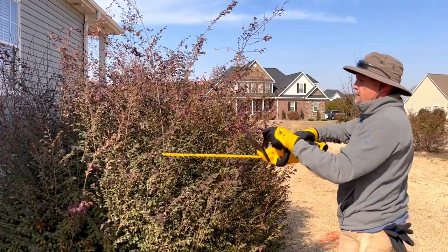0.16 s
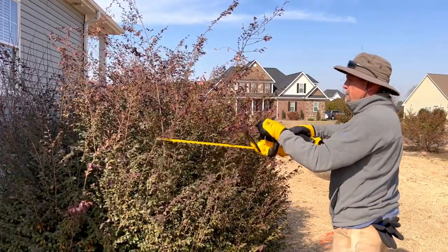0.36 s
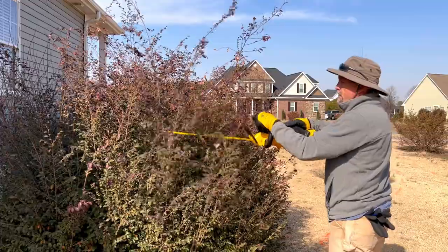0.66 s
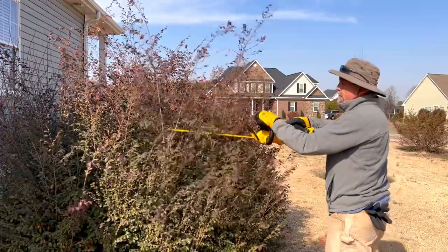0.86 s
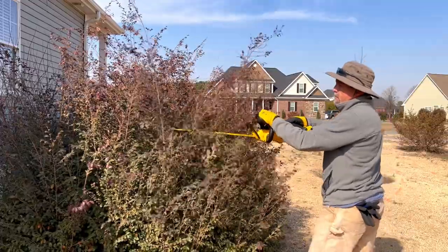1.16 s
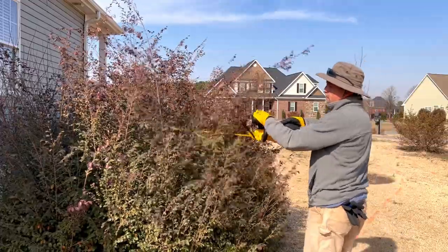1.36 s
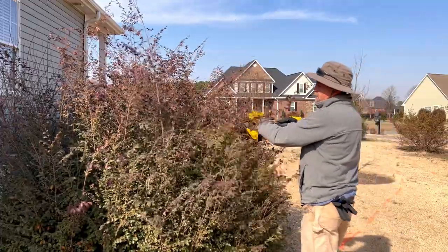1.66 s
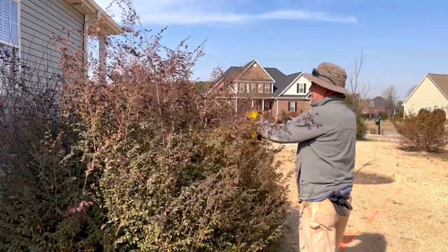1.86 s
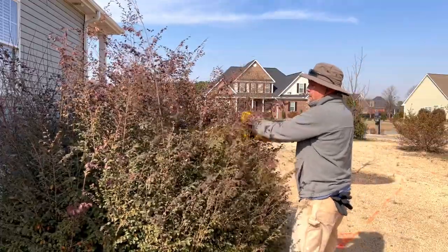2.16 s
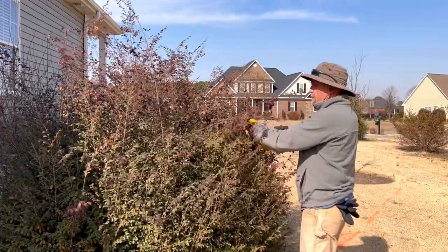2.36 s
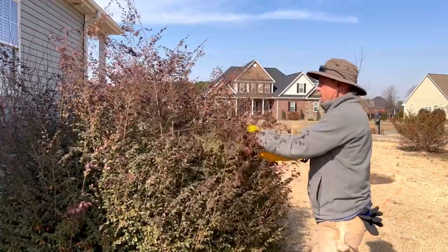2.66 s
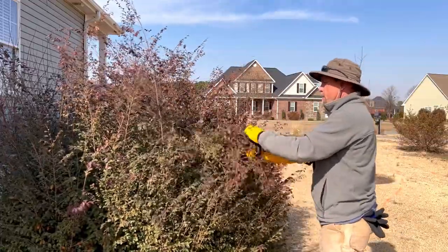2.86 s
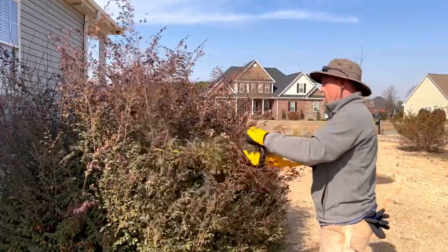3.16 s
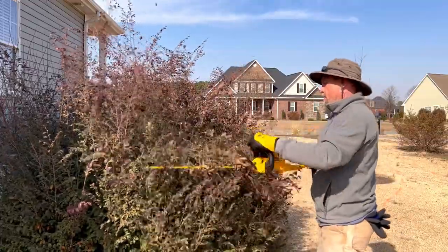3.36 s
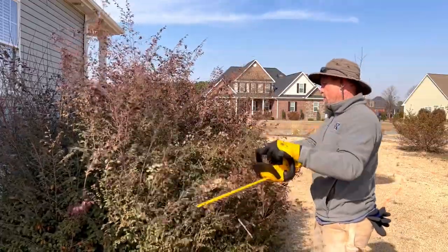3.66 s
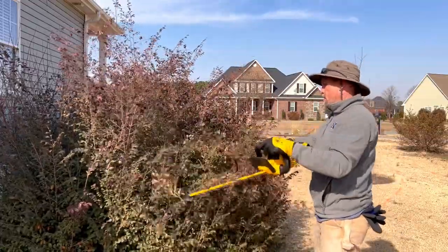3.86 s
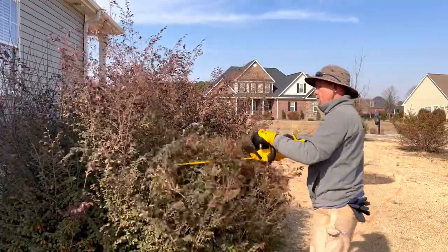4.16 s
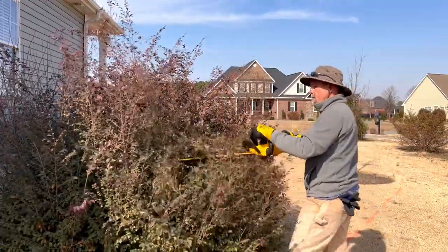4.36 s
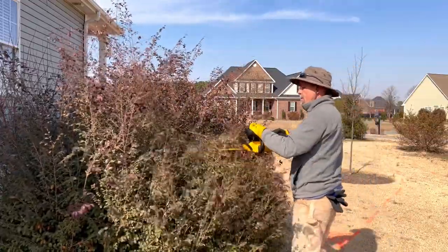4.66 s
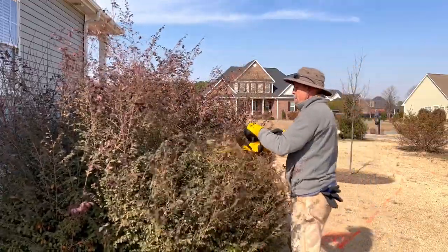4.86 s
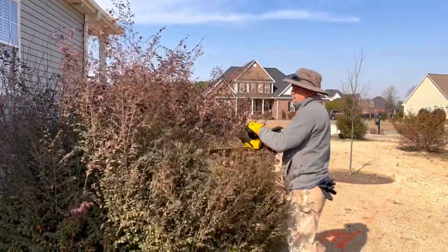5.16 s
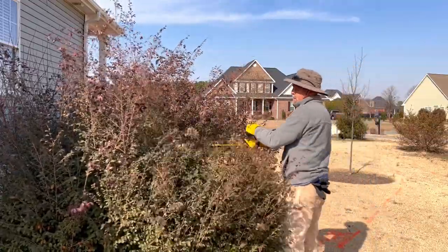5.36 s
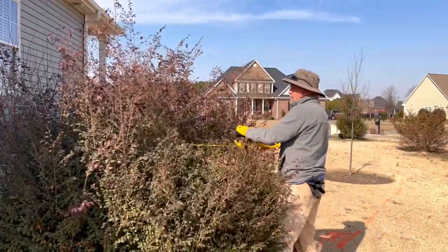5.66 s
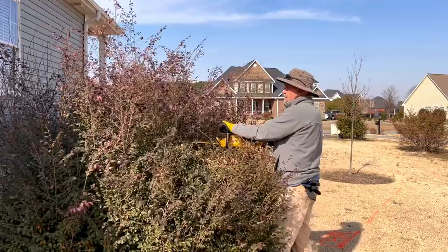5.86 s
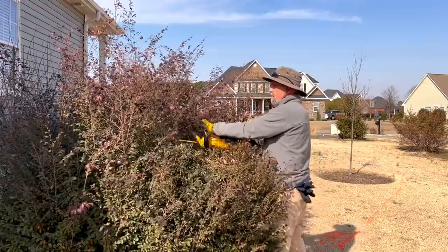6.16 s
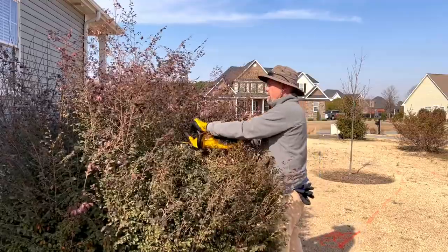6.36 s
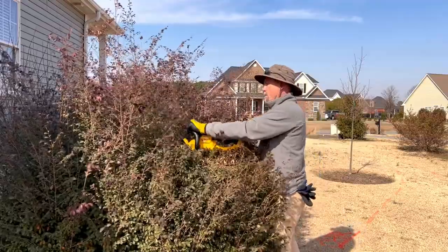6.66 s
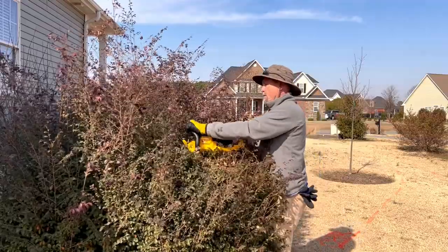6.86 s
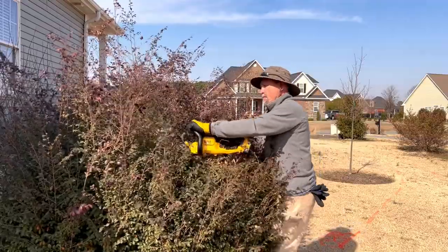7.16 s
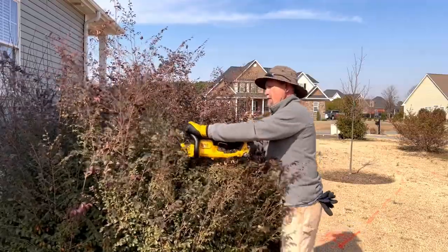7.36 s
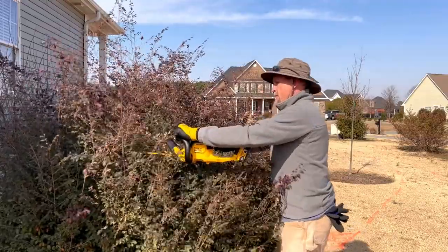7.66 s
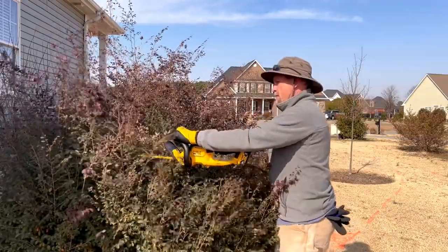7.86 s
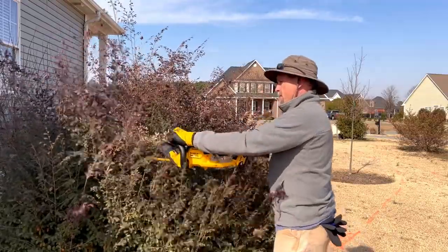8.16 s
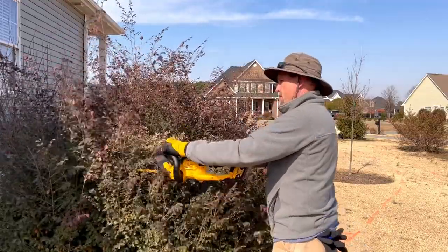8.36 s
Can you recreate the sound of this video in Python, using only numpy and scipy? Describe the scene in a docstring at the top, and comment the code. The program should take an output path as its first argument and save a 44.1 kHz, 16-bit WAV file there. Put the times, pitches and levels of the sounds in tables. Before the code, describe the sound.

A cordless hedge trimmer runs throughout, with a steady mid-pitched electric hum, gritty gear rattle and fast metallic blade scraping. Its pitch dips with each bite into a dry shrub, as leaves crunch and twigs snap. Cuts come in clusters with freer running between, the last ones loudest. Open yard beside a house, microphone a few metres away, slight close reflections and low wind gusts early on.

```python
"""Cordless hedge trimmer in a twiggy shrub

Outdoors, a few metres from the microphone, a motor hums at its turning rate and slows with each cut.
Gear impacts rattle case and housing; the blades scrape and the bar clacks, twice a crank turn.
Leaves crunch in bursts of tiny impacts, and twigs snap as tearing fibres with a crack, knock and splinters.
Delayed copies from the lawn and a house wall shift as the trimmer moves, over a short tail from the yard.
A light wind rumbles on the microphone as gusts of low noise over a faint background."""
import sys
import numpy as np
from scipy import signal
from scipy.fft import rfft, irfft, next_fast_len
from scipy.io import wavfile
from scipy.ndimage import uniform_filter1d, map_coordinates

SR = 44100
rng = np.random.default_rng(int(sys.argv[2]) if len(sys.argv) > 2 else 0)


def int16_out(signal):
    """Quantize to a 16-bit WAV file."""
    q = np.round(np.clip(np.atleast_2d(signal).T, -1, 1) * 32767)
    wavfile.write(sys.argv[1], SR, q.astype(np.int16))


N = 375732  # length in samples


def amp(db):
    """Decibels to gain."""
    return 10 ** (np.asarray(db) / 20)


def unit(x):
    """x at rms 1."""
    return x / np.sqrt(np.mean(x ** 2) + 1e-20)


def curves(rows):
    """One value per sample for each column after the time."""
    s, *columns = np.transpose(rows)
    return [np.interp(np.arange(N) / SR, s, column) for column in columns]


def wobble(rate):
    """A smooth random curve, rate knots a second."""
    knots = rng.standard_normal(int(N * rate / SR) + 4)
    return map_coordinates(knots, [np.arange(N) * rate / SR])


def swell(s, half):
    """A bell-shaped rise and fall around time s."""
    return np.exp(-((np.arange(N) / SR - s) / half) ** 2)


def beat(phase, depth_db):
    """A gain that swells once a cycle, at rms 1."""
    return unit(amp(depth_db * np.cos(2 * np.pi * phase)))


def noise():
    """White noise."""
    return rng.standard_normal(N)


def ticks(rate, size=N):
    """Tiny impacts at random moments, rate a second, of random strength."""
    return rng.standard_normal(size) * (rng.random(size) < rate / SR)


def filtered(x, response):
    """x times a complex response of frequency."""
    m = next_fast_len(len(x) + 8192)
    spectrum = rfft(x, m) * response(np.fft.rfftfreq(m, 1 / SR))
    return irfft(spectrum, m)[:len(x)]


def coloured(x, spectrum):
    """x shaped by (Hz, dB) points, at rms 1."""
    f, db = np.transpose(spectrum)
    return unit(filtered(x, lambda hz: amp(np.interp(np.log(hz + 1), np.log(f), db))))


def rung(x, modes):
    """x ringing in (Hz, width Hz, dB) resonances, at rms 1."""
    def response(f):
        return sum(amp(db) * 1j * f * w / (c * c - f * f + 1j * f * w) for c, w, db in modes)
    return unit(filtered(x, response))


def swept(x, modes, shift):
    """x through (Hz, width Hz, dB) resonances whose frequencies all move by the factor shift, at rms 1."""
    hz, s, z = signal.stft(x, SR, nperseg=1024)
    f = hz[:, None] / np.interp(s, np.arange(N) / SR, shift)
    power = sum(amp(db) ** 2 * (f * w) ** 2 / ((c * c - f * f) ** 2 + (f * w) ** 2) for c, w, db in modes)
    return unit(signal.istft(z * np.sqrt(power), SR, nperseg=1024)[1][:N])


# The blades bite into a bunch of twigs. Each row: start in seconds, length in seconds, drag in Hz (the sag
# it would settle at), typical level of its thin twigs in dB, their splinters in dB.
CUTS = [(0.681, 0.082, 26.5, -45.0, -3.0), (0.817, 0.18, 26, -52, -3.0), (1.037, 0.14, 24.0, -38, -8),
        (1.259, 0.025, 22, -40.0, -4.5), (1.427, 0.14, 19.4, -35.5, -8), (2.454, 0.41, 9.2, -42, 13.0),
        (2.862, 0.076, 25.4, -47, 8.0), (2.973, 0.057, 64, -38, 3.0), (3.08, 0.111, 37.5, -34, 0.0),
        (3.227, 0.034, 43, -45, 0.0), (4.24, 0.08, 62, -36, -8), (4.351, 0.075, 51, -39, -8),
        (4.421, 0.083, 59, -33.0, -11.0), (4.564, 0.092, 34, -35, -9.0), (4.655, 0.12, 18.6, -47, -6.0),
        (4.79, 0.17, 10.4, -44, -6), (4.953, 0.13, 39.9, -43, -7.0), (5.078, 0.13, 31.2, -42, -3.0),
        (6.186, 0.076, 18, -40.0, -6.0), (6.322, 0.07, 31.8, -34, -8.0), (6.436, 0.078, 30, -33, -10.0),
        (6.526, 0.088, 21.4, -37, 1), (6.684, 0.14, 20, -38, 3.0), (6.913, 0.086, 24, -38.0, 4),
        (7.225, 0.063, 29.5, -41, 0.0), (7.418, 0.089, 30.5, -34.0, 2.0), (7.64, 0.11, 31, -34.0, 2),
        (7.8, 0.16, 17.2, -47.0, 0.0), (8.2, 0.063, 24.6, -29, 0)]
FREE_HZ = 465.8  # mean motor turns a second with nothing between the teeth
TURNS_PER_STROKE = 7.58  # motor turns; two strokes make a crank turn
INERTIA_S = 0.04  # the rotor's speed trails the load
FULL_SAG_HZ = 30.3  # drag that counts as a full load
BEND_S = 0.01177  # the twigs load the motor this long before they snap


def motor(waver_hz=3.2):
    """Load (1 = full) and speed: each cut drags the motor down, and it recovers once the twigs are through."""
    t = np.arange(N) / SR + BEND_S
    drag_hz = sum(drag * ((t > s) & (t < s + length)) for s, length, drag, _, _ in CUTS)
    keep = np.exp(-1 / (INERTIA_S * SR))
    sag_hz = signal.lfilter([1 - keep], [1, -keep], drag_hz)
    load = np.clip(uniform_filter1d(drag_hz / FULL_SAG_HZ, size=1500), 0, 1)
    return load, FREE_HZ - sag_hz + waver_hz * wobble(8)


# How strongly the hum is heard as the trimmer turns. Each row: time in seconds, level in dB before trim
# and flutter.
HUM = [(0, -63), (1.35, -61), (1.8, -60), (1.99, -55), (2.2, -60), (2.6, -53), (3.3, -51), (3.6, -62),
       (4.1, -62.5), (4.7, -52.5), (5.2, -60.5), (5.38, -58), (6.1, -56.5), (6.55, -51), (7.1, -49.5),
       (8.52, -55.5)]


def hum(stroke, flutter_db=1.3, trim_db=-1.5):
    """The motor's unbalance sings at its turning rate; the crank adds weak side tones."""
    turn = 2 * np.pi * stroke * TURNS_PER_STROKE
    sway = 1 + 0.38 * np.cos(2 * np.pi * stroke) + 0.08 * np.cos(np.pi * stroke)
    level_db = curves(HUM)[0] + trim_db + flutter_db * wobble(30)
    return amp(level_db) * unit(sway * np.sin(turn))


def gears(stroke, repeat_db=-5, renew_per_s=3, size=1400):
    """Tooth impacts: a slowly changing pattern returns with every crank turn, the rest rattles freely."""
    renewal = np.arange(N) / SR * renew_per_s
    teeth = rng.standard_normal((int(renewal[-1]) + 2, size))
    position = stroke / 2 % 1 * size  # place within the crank turn
    pattern = unit(map_coordinates(teeth, [renewal, position], order=1, mode="grid-wrap"))
    rattle = amp(repeat_db) * pattern + unit(ticks(3200))
    return rattle * beat(stroke / 2, depth_db=1.03) * amp(1.4 * wobble(45))


# Running mechanism as the tool is moved. Each row: time in seconds, gear rattle in dB, blade slide in dB,
# both before trim and load.
RUNNING = [(0.0, -46.5, -44.5), (0.47, -43.5, -47), (0.95, -44, -48), (1.83, -46.5, -51),
           (2.18, -46.5, -50.5), (2.65, -43, -48), (3.06, -42.5, -46), (3.63, -45, -44.5),
           (4.08, -45, -47.5), (4.39, -44, -46.5), (4.75, -43, -48.5), (5.12, -42.5, -49),
           (5.25, -47, -52.5), (5.9, -47.5, -49.5), (6.5, -43.5, -47), (7.52, -42.5, -45),
           (7.76, -39.5, -46), (8.52, -37, -45)]
# Gear case noise. Each row: frequency in Hz, level in dB.
GEAR_COLOUR = [(100, -28), (270, -35), (400, -14.5), (620, -9), (920, -4), (1130, -3), (1330, -1.5),
               (1520, 1.5), (1750, -4), (2500, -2), (3200, -2.2), (4200, -7.5), (6500, -9), (16000, -57)]
# Boom of the plastic housing. Each row: time in seconds, level in dB with no load.
BOOM = [(0, -64), (.8, -53.5), (2.1, -60), (2.6, -52.5), (3.2, -50), (3.5, -58.5), (5.0, -56.5),
        (5.3, -61.5), (5.95, -61), (6.5, -55.5), (7.3, -52), (8.52, -55.5)]
# Housing resonances. Each row: frequency in Hz, width in Hz, level in dB.
HOUSING_MODES = [(518, 17, -25), (635, 290, 6)]
# Hollow, gliding resonance in the gear noise, as the lawn echo's lag changes. Each row: time in seconds,
# level in dB, factor on the resonance frequencies.
GLIDE = [(0, -58, 1.08), (3.6, -59.5, 0.77), (4.3, -48.5, 0.94), (5.1, -51, 1), (5.3, -61, 1.08),
         (5.8, -65, 1.1), (6.3, -70, 1), (8.52, -50, 0.85)]
# Gliding resonances before that factor. Each row: frequency in Hz, width in Hz, level in dB.
GLIDE_MODES = [(800, 180, -7.5), (2070, 290, -3.5)]
# Steel bar's ring, strongest when it swings clear of the shrub. Each row: time in seconds, level in dB.
BAR_RING = [(0, -45.5), (.5, -54), (.8, -75), (2.1, -58), (2.6, -69), (3.2, -61), (3.45, -44.5),
            (3.63, -41.5), (3.85, -43.5), (4.2, -56), (5.5, -57), (7.4, -53), (8.52, -49)]
# Bar resonances. Each row: frequency in Hz, width in Hz, level in dB.
BAR_MODES = [(1396, 106, 4), (1590, 95, 5.5), (4210, 77, -3.5), (4640, 170, -2.5), (6940, 220, -5.5),
             (7360, 160, -6.5), (9600, 190, -8), (12680, 140, -9.5)]
# Gear case's ring, strongest when its side faces the microphone. Each row: time in seconds, level in dB.
CASE_RING = [(0, -49), (.6, -54), (1.3, -51), (2.1, -52), (3.1, -50), (3.6, -51), (4.4, -57), (5.3, -56.5),
             (6.1, -50.5), (7.3, -55), (7.9, -47), (8.52, -47.5)]
# Gear case resonances. Each row: frequency in Hz, width in Hz, level in dB.
CASE_MODES = [(1335, 94, 3.5), (1496, 69, -7), (2307, 140, -4.5), (2685, 160, -7), (3070, 150, -7),
              (5520, 130, -11)]


def drive(stroke, load, trim_db=-2.5, strain_db=-1.0, boom_strain_db=-1.0):
    """The gears shake case and hollow housing, a little softer under load; case and bar ring at each reversal."""
    def clack():
        return ticks(2200) * beat(stroke, depth_db=2.0) * beat(stroke / 2, depth_db=2.0)

    case = amp(curves(RUNNING)[0] + trim_db + strain_db * load) * coloured(gears(stroke), GEAR_COLOUR)
    housing = amp(curves(BOOM)[0] + boom_strain_db * load) * rung(gears(stroke), HOUSING_MODES)
    glide_db, shift = curves(GLIDE)
    glide = amp(glide_db) * swept(gears(stroke), GLIDE_MODES, shift)
    bar_ring = amp(curves(BAR_RING)[0]) * rung(clack(), BAR_MODES)
    case_ring = amp(curves(CASE_RING)[0]) * rung(clack(), CASE_MODES)
    return case + housing + glide + bar_ring + case_ring


# Steel sliding on steel. Each row: frequency in Hz, level in dB.
SLIDE = [(500, -15), (2500, 4.5), (5500, 1.5), (8800, -0.5), (10500, 1.5), (12500, 0.5), (14500, -3),
         (16000, -10)]
# Blades' ring over their scraping, strongest while they are held flat. Each row: time in seconds,
# high modes in dB, bending mode in dB.
BLADE_RING = [(0, -16, -11), (.6, -8, -8.5), (1.4, -7, -13), (2, -15, -15), (4, -15, -13), (5.7, -7, -34),
              (7.2, -11, -37), (8.52, -2.5, -24)]
# High blade resonances. Each row: frequency in Hz, width in Hz, level in dB before it fades in and out.
BLADE_MODES = [(7950, 150, -2.5), (9950, 120, -7), (12060, 170, 5), (12600, 430, -7), (13720, 110, -6)]
# Bending resonance of the blades. Each row: frequency in Hz, width in Hz, level in dB.
BLADE_BEND = [(5610, 130, 0)]
# Tinny rings that swell and fade as the tool is turned. Each row: crest in seconds, half-length in seconds,
# frequency in Hz, width in Hz, level at the crest in dB.
PASSING_RINGS = [(0.95, 0.49, 3160, 280, -54), (1.02, .25, 6300, 250, -57), (1.2, 0.27, 2100, 160, -56),
                 (1.4, 0.36, 2570, 90, -57), (2.0, 0.31, 7250, 350, -59), (2.35, 0.24, 7860, 301, -55),
                 (2.9, 0.71, 3500, 300, -55.5), (4.85, .35, 5010, 500, -52), (5.5, 0.88, 1550, 150, -57),
                 (5.55, .35, 990, 140.1, -60), (7.2, 1.23, 9760, 140.4, -58.5), (7.3, 0.85, 3800, 300, -53),
                 (8.2, .5, 3032, 120, -49)]


def blades(stroke, load, trim_db=0.23, strain_db=2.1, fade_db=1.5, fade_per_s=3):
    """The toothed blades scrape over each other on every stroke and ring thinly; the high rings come and go."""
    rubbing = beat(stroke, depth_db=1.35) * amp(1.6 * wobble(60))

    def scrape():
        return ticks(14000) * rubbing

    high_db, bend_db = curves(BLADE_RING)
    high = unit(sum(amp(db + fade_db * wobble(fade_per_s)) * rung(scrape(), [(hz, width, 0)])
                    for hz, width, db in BLADE_MODES))
    bend = rung(scrape(), BLADE_BEND)
    steel = coloured(scrape(), SLIDE) + amp(high_db) * high + amp(bend_db) * bend
    contact = scrape()
    passing = sum(amp(db) * swell(s, half) * rung(contact, [(hz, width, 0)])
                  for s, half, hz, width, db in PASSING_RINGS)
    return amp(curves(RUNNING)[1] + trim_db + strain_db * load) * steel + passing


# Leaves and thin shoots being crushed. Each row: frequency in Hz, level in dB.
CRUNCH = [(200, -24), (700, -3.5), (3000, 4.5), (4300, 2.5), (6000, 5), (8500, -6.5), (12000, -3.5),
          (16000, -19)]


def foliage(stroke, load, scatter_db=5, closing=0.28, brushing=0.31, size=600):
    """Each closing of the teeth crushes a new bite of shoots; the greater the load, the louder the crunch."""
    count, age = np.divmod(stroke + 0.11, 1)  # age and closing in strokes
    bite = amp(scatter_db * np.tanh(rng.standard_normal(size)))[count.astype(int)]
    squeeze = (age / closing) ** 2 * np.exp(-2 * age / closing)  # the shoots bend, then give way
    crush = ticks(7000) * bite * (squeeze + 0.034)
    return amp(-54.0) * (brushing + load) * coloured(crush, CRUNCH)


# Thick twigs that crack above the crunch. Each row: time in seconds, level in dB (19 dB above the burst's
# rms), tearing time in ms, crack pitch in Hz, then crack, woody knock and splinters in dB over the crunch.
SNAPS = [(0.686, -26.5, 3.2, 6800, -8, 1, -2.0), (0.72, -30.5, 1.6, 6200, -9.0, -10, -10),
         (0.8208, -27, 2.5, 7600, -14, -3, -4), (0.887, -38, 1, 6300, 9.0, -0.0, -0.0),
         (0.9044, -32, 1.6, 5400, -1.0, -8, -3), (0.9222, -33.4, 0.6, 6200, 1.0, -12.0, -6.0),
         (0.9392, -32, 1.3, 5400, 3, -9, -2.0), (0.956, -32, 1.3, 6000, 12, -12.0, 7.0),
         (1.058, -32, 2.5, 5500, -2.0, -2, -3), (1.126, -28.5, 2.5, 6170, 11, 9, 7),
         (1.2614, -30, 1.2, 6600, -7, -2, -8), (1.4255, -32, 1.4, 6900, -5.0, -5.0, -4),
         (2.404, -31, 1.06, 6100, 5, -11, 1), (2.42, -31, 3.8, 5900, 3.0, 8, 9.0),
         (2.519, -26.5, 2, 6000, -2.0, -8.0, 2), (2.551, -29, 2.3, 5980, -1.0, 1.0, 4.0),
         (2.6352, -31, 1.36, 6200, -12.0, 5, 6), (2.669, -29.5, 0.64, 6100, 1.0, 4, 5),
         (2.8512, -29, 2, 5400, 4.0, 6, 8), (2.8685, -31, 1.1, 6270, -2.0, -4.0, 5),
         (2.884, -28, 1.5, 7100, -3.0, 1, 2.0), (2.9177, -33, 1.1, 8100, 2.0, 4, 10),
         (2.9681, -29, 1.6, 5400, -9, -13, -4.0), (2.985, -25, 1.5, 5800, -4, 1, 4.5),
         (3.0026, -29, 1.4, 5900, 0, -7, 4), (3.0412, -28.5, 0.94, 6460, 7.0, -12.0, 9.0),
         (3.0885, -23, 2, 7900, -5, -12.0, -4), (3.1244, -25.5, 1.8, 5400, 6.0, 8, 11),
         (3.1432, -30, 0.62, 5410, 6, 0, 11), (3.1585, -23, 3.6, 8100, -16, -5, -6),
         (3.2266, -23.5, 2.5, 6200, 3, 6.5, 3.5), (4.2406, -28.5, 2.9, 5810, 10, 7, 1.0),
         (4.2573, -24.5, 1.7, 5900, -1, -6, -9.0), (4.295, -26, 0.98, 5700, 4.0, -2, -4.0),
         (4.3503, -28, 1.35, 5910, 5, 1, -3.0), (4.401, -26.5, 1, 5840, 1, -6, -16),
         (4.437, -25, 1.5, 5710, -2, -10, -15), (4.4754, -30.5, 1.6, 5390, 9.0, -11.0, -0.0),
         (4.4928, -31, 1.5, 7900, 2, 4, -1), (4.597, -33.5, 0.74, 6100, 6, -12.0, -5),
         (4.6137, -28, 0.71, 6045, 6, -6, -1.0), (4.6665, -34, 1.4, 6130, 11, 6, 4),
         (5.02, -27.0, 1.93, 5920, -2, -14, -8), (5.056, -31, 1.35, 5795, -5.0, -14, -9.0),
         (5.091, -32, 1.6, 6100, -5.0, -7.0, -4.0), (5.109, -33, 1.5, 8100, -2, -12.0, -7),
         (5.126, -30.5, 1, 6000, 6, -4, -11.0), (5.1608, -30.5, 1.3, 5870, 5.0, 5, 1.0),
         (5.385, -38, 1.2, 5900, -4, 8, -8), (5.4505, -38, 0.6, 5900, -4, 9, -10),
         (6.1726, -28, 1.4, 7800, -3, -9, -15), (6.2063, -28, 1.8, 6600, 4, -12.0, -12.0),
         (6.223, -28.5, 2.6, 7890, -1, -12.0, -12.0), (6.238, -28, 2.5, 6300, 10, 4, -4.0),
         (6.321, -25, 1.77, 6940, 3, -8, -2), (6.3384, -32, 2.44, 6960, 5, -9, -12.0),
         (6.3552, -24, 2.24, 6880, 7.0, 1, -8), (6.4564, -22.5, 2.23, 6510, 4, -1.5, -5),
         (6.526, -28, 1.84, 7880, -6, -8, -10), (6.5442, -30, 0.92, 7690, 3, -8, -12.0),
         (6.5606, -26, 1.66, 6430, 8.0, 2, 0), (6.693, -29.5, 2.15, 6300, -3.0, -2, 8),
         (6.727, -28, 3.4, 5946, -8, -7.0, -1), (6.745, -28, 1.5, 6080, 11, 10, 4.0),
         (6.928, -24.3, 2.85, 7220, 0, -10, -1), (6.9455, -25, 2.06, 6500, -12.0, -6.0, -5),
         (6.962, -27.5, 2.46, 6920, -5.0, -9, -12.0), (7.2255, -25, 2.3, 7100, -5, -6, -4),
         (7.242, -26, 1.64, 6330, 4.0, 1, 5.0), (7.2591, -29, 1.03, 5930, 4, -10.0, 3),
         (7.4088, -27, 1.3, 6310, 6, -9, 5.0), (7.4415, -25, 1.6, 5400, 6, -7, -2),
         (7.4583, -23, 1.22, 6010, 5, 0, 7.0), (7.4757, -24, 1.35, 6140, 1, -5, -3),
         (7.4938, -26, 1.64, 5910, 11, 4, 3.0), (7.6416, -21.5, 1.8, 6690, 1, -6, -15),
         (7.6755, -23.5, 1.64, 6300, 13, -12.0, 5), (7.6942, -21.5, 1.94, 7400, -3, -18, -6.0),
         (7.7283, -18.9, 2.86, 6310, 4, -12.0, 0), (7.8612, -24, 1.76, 6334, -1, 3, -1.0),
         (7.8947, -22.5, 2.47, 6680, -2, -9, -15), (7.93, -26, 0.97, 6580, 4.0, -1, 2),
         (8.193, -21.5, 3.8, 8060, -8.0, -10, -7), (8.227, -20, 2.7, 5460, -4, -5.0, -4)]
# Resonances of the wood. Each row: frequency in Hz, width in Hz, level in dB.
WOOD_MODES = [(630, 165, -4), (1370, 480, -2.5), (3230, 660, -6)]
# Fine splinters of a breaking twig. Each row: frequency in Hz, level in dB.
SPLINTERS = [(1000, -26), (6000, -13), (9000, -10), (12000, -7), (16000, -24)]


def snaps(twigs, onset_s=0.0012, tail_s=0.038, shake_db=-16, width_hz=700, size=4096):
    """A twig gives way in a burst of breaking fibres: a crunch, a pitched crack, a woody knock and splinters."""
    out, t = np.zeros(N + size), np.arange(size) / SR
    for s, db, tear_ms, pitch_hz, crack_db, knock_db, splinter_db in twigs:
        age = t * 1000 / tear_ms
        # the stem gives suddenly and the break runs through it, then the leaves shake
        tear = (1 - np.exp(-t / onset_s)) * np.exp(1 - age / 2)
        shake = (1 - np.exp(-age)) * np.exp(-t / tail_s)
        envelope = tear + amp(shake_db) * shake

        def fibres():
            return ticks(14000, size=size) * envelope

        crunch = coloured(fibres(), CRUNCH)
        crack = amp(crack_db) * rung(fibres(), [(pitch_hz, width_hz, 0)])
        knock = amp(knock_db) * rung(fibres(), WOOD_MODES)
        splinters = amp(splinter_db) * coloured(fibres(), SPLINTERS)
        start = round(s * SR)
        out[start:start + size] += amp(db - 19) * unit(crunch + crack + knock + splinters)
    return out[:N]


def thin_twigs(motor_hz, tear_ms=1.0, pitch_hz=6150, pitch_scatter=0.036, scatter_db=5.5, return_db=-3,
               crack_db=-4, knock_db=-7, clear_s=.01, count=40):
    """In a cut, each closing of the teeth that meets no thick twig snaps a thin one, weaker on the return."""
    twigs = []
    for start, length, _, db, splinter_db in CUTS:
        s = start
        for k, (force, stiffness, wood) in enumerate(np.tanh(rng.standard_normal((count, 3)))):
            if s > start + length:
                break
            if all(abs(s - thick[0]) > clear_s for thick in SNAPS):
                level_db = db + return_db * (k % 2) + scatter_db * force
                pitch = pitch_hz * np.exp(pitch_scatter * stiffness)
                wood_db = knock_db + scatter_db * wood
                twigs.append((s, level_db, tear_ms, pitch, crack_db, wood_db, splinter_db))
            s += TURNS_PER_STROKE / motor_hz[round(s * SR)]  # one stroke later
    return twigs


def scatter(x, copy_db=-19, drift_ms=0.147, count=6):
    """Weak, randomly drawn scattered copies of the upper sound, with slowly drifting lags, blur its colour."""
    lags_ms = rng.uniform(.5, 3.5, count)
    upper = filtered(x, lambda hz: hz ** 2 / (hz ** 2 + 2000 ** 2))
    n = np.arange(N)
    copies = [np.interp(n - (ms + drift_ms * wobble(2)) * SR / 1000, n, upper) for ms in lags_ms]
    return x + amp(copy_db) * sum(copies)


# The echoes as the trimmer moves. Each row: time in seconds, lawn lag in ms, lawn level in dB,
# house wall lag in ms.
ECHOES = [(0, 3.08, -9, 9.3), (1, 2.75, -9, 8.3), (2, 2.55, -7, 9.6), (3, 2.86, -6, 9.2),
          (3.65, 2.95, -14, 10), (4.3, 2.43, -8.5, 8.8), (5, 2.4, -11, 8.4), (5.7, 2.29, -9, 8.05),
          (6.5, 2.56, -5, 7.9), (7.25, 2.8, -7.5, 8.47), (8.52, 3.15, -12, 9.25)]


def echoes(x, lawn_hz=1150, wall_hz=2600, wall_db=-18.5):
    """The lawn returns a dull copy and the house wall a later, brighter one; both lags shift with the trimmer."""
    lawn_ms, lawn_db, wall_ms = curves(ECHOES)
    n = np.arange(N)

    def late(ms, top_hz):
        dulled = filtered(x, lambda hz: 1 / (1 + (hz / top_hz) ** 4))
        return np.interp(n - ms * SR / 1000, n, dulled)

    return x + amp(lawn_db) * late(lawn_ms, lawn_hz) + amp(wall_db) * late(wall_ms, wall_hz)


def yard(x, t60=0.14, wet_db=-15, size=11025):
    """The shrub and the yard scatter a short, weak tail that falls 60 dB in t60 seconds."""
    tail = rng.standard_normal(size) * amp(-60 * np.arange(size) / SR / t60)
    return x + amp(wet_db) * signal.fftconvolve(x, tail / np.linalg.norm(tail))[:N]


# Gusts on the microphone. Each row: crest in seconds, level at the crest in dB, half-length in seconds.
GUSTS = [(0.06, -24.5, 0.033), (0.353, -23.5, 0.11), (0.718, -23, 0.068), (0.896, -28, 0.075),
         (1.147, -28, 0.048), (1.363, -33, .1), (1.6, -35, 0.055), (1.74, -27, 0.075), (1.966, -26, 0.21),
         (2.204, -28.5, 0.088), (2.47, -27, 0.11), (2.68, -35, 0.08), (2.949, -41.5, 0.33),
         (4.1, -39.5, 0.1), (4.4, -44.5, 0.28), (6.68, -53, 0.059), (7.024, -40, 0.24)]
# Wind rumble. Each row: frequency in Hz, level in dB.
RUMBLE = [(1, 0), (4, 15), (8, 13), (15, 0.5), (25, -6), (45, -21), (70, -28.5), (130, -48), (400, -84),
          (1000, -120)]
# Distant background. Each row: frequency in Hz, level in dB.
AIR = [(20, 9.5), (60, -5), (110, -2.5), (145, -0.5), (210, 0), (270, -5.5), (1000, -25), (16000, -35)]
BREEZE_DB = -58  # wind between the gusts


def wind(buffet_db=2.0):
    """Gusts swell and buffet the microphone over a faint outdoor background."""
    power = amp(BREEZE_DB) ** 2 + sum(amp(db) ** 2 * swell(s, half) for s, db, half in GUSTS)
    buffeting = unit(amp(buffet_db * wobble(5.8)) * coloured(noise(), RUMBLE))
    return np.sqrt(power) * buffeting + amp(-66.5) * coloured(noise(), AIR)


def scene():
    """The cuts load the motor, and the motor's speed times every part of the trimmer."""
    load, motor_hz = motor()
    stroke = np.cumsum(motor_hz) / SR / TURNS_PER_STROKE  # strokes so far
    machine = drive(stroke, load) + blades(stroke, load)
    # the hum's levels already include its reflections, and the wind acts on the microphone
    low = hum(stroke) + wind()
    shrub = foliage(stroke, load) + snaps(SNAPS) + snaps(thin_twigs(motor_hz))
    return (yard(echoes(scatter(machine + shrub))) + low)[None]


TOP_HZ = 15900  # band limit


def record(dry):
    """The microphone channel keeps nothing above its band limit."""
    return filtered(dry[0], lambda hz: hz < TOP_HZ)[None]


dry = scene()
out = record(dry)
int16_out(out)
```